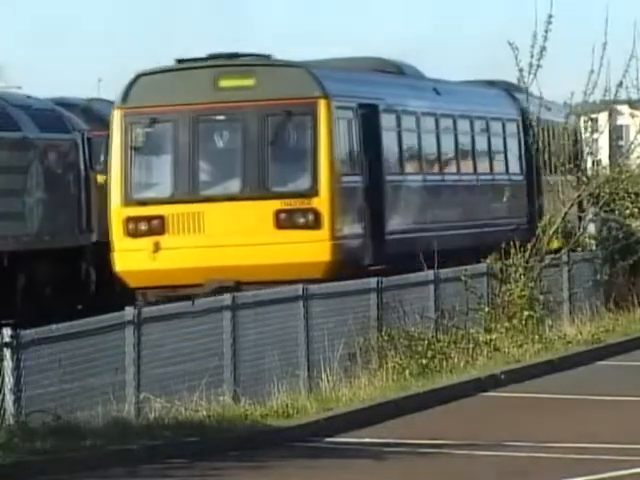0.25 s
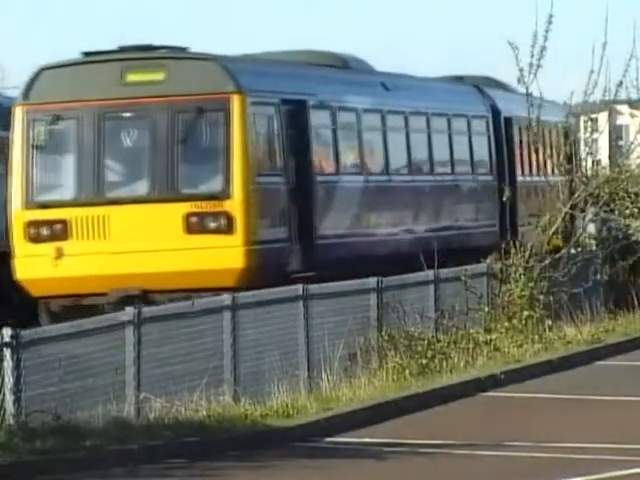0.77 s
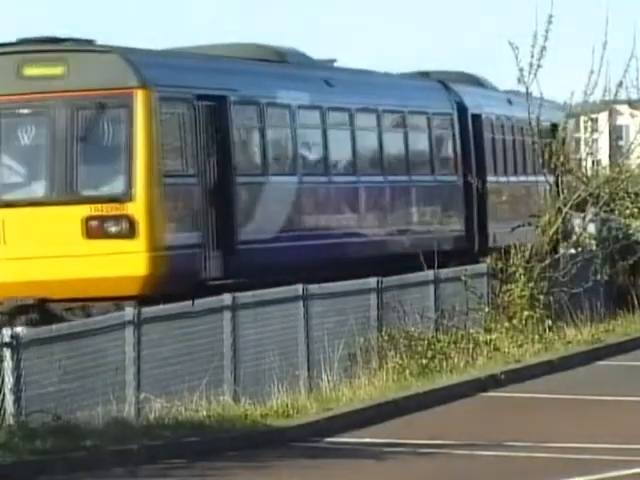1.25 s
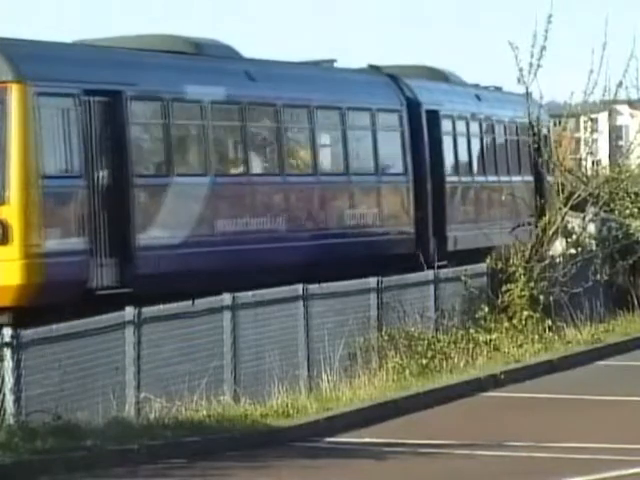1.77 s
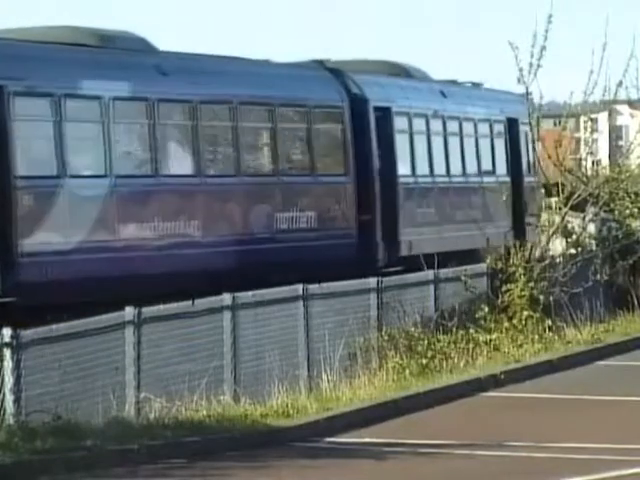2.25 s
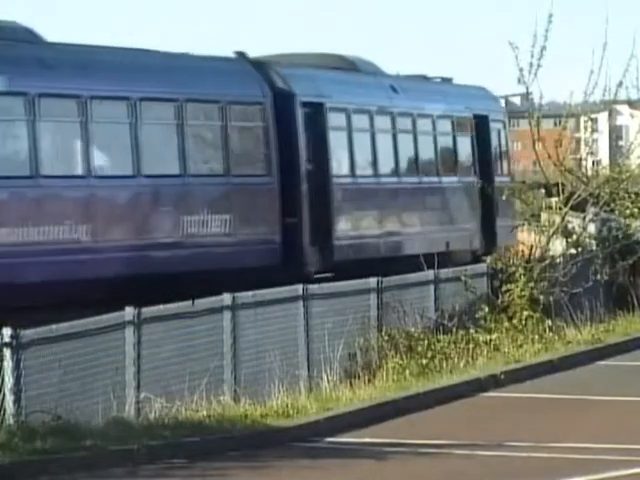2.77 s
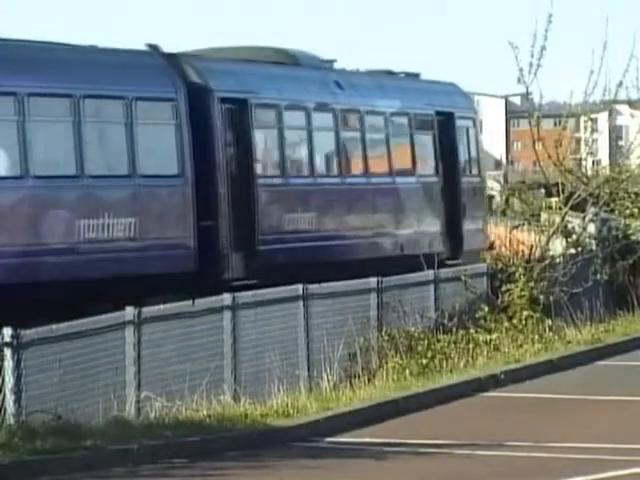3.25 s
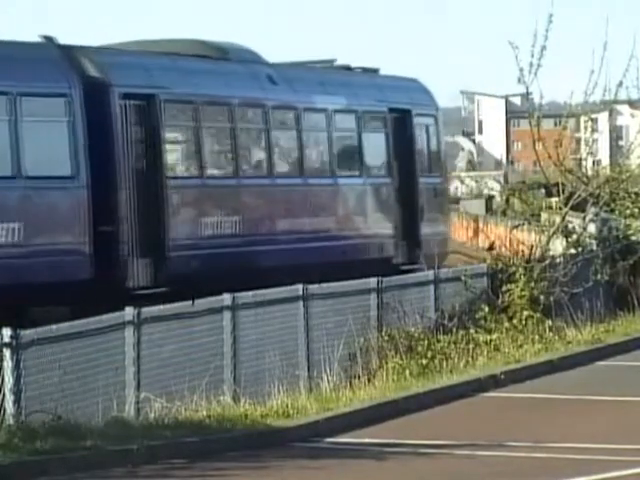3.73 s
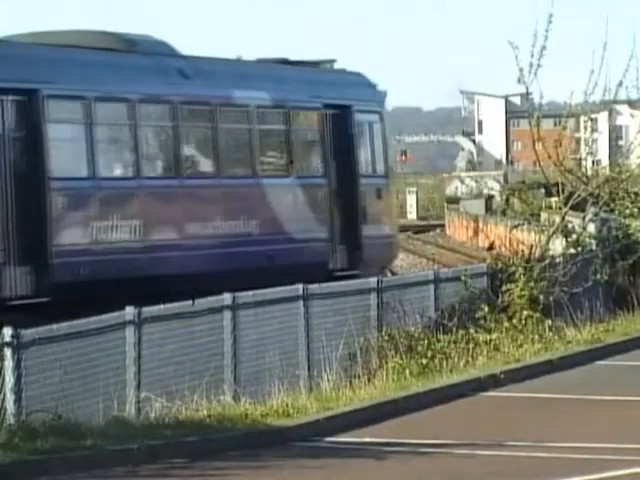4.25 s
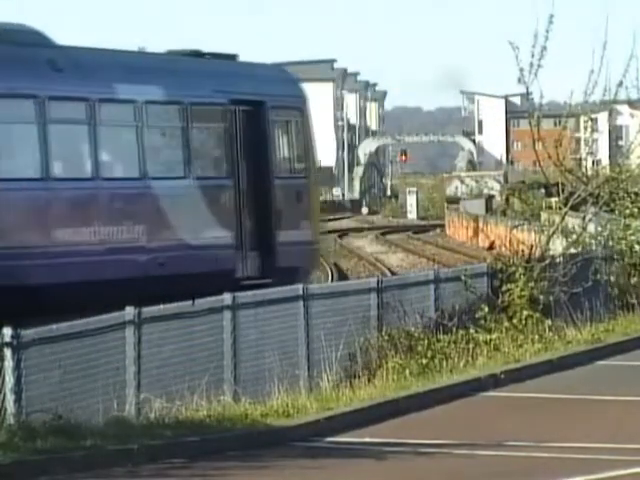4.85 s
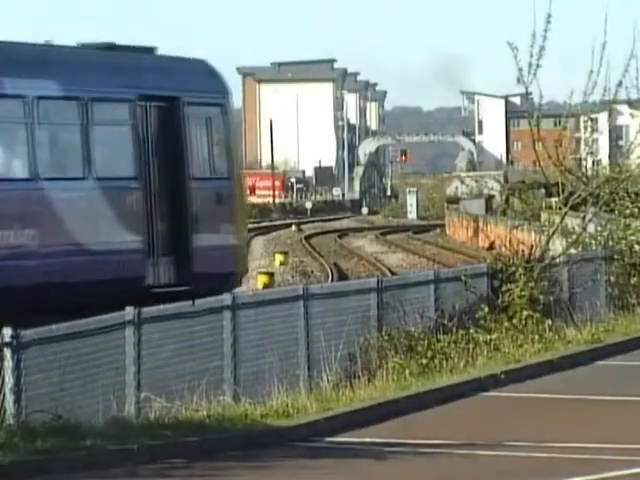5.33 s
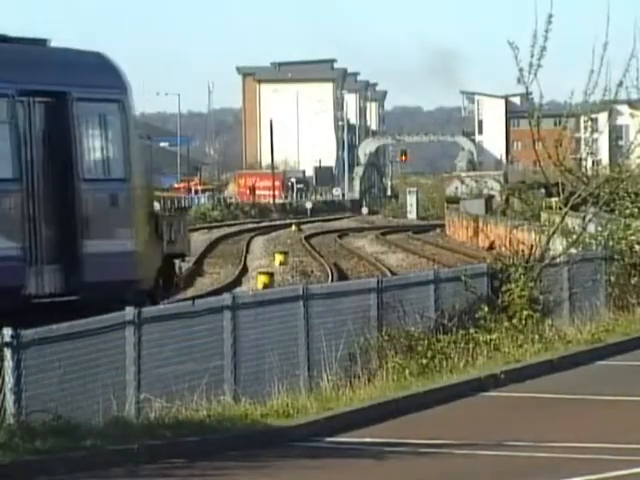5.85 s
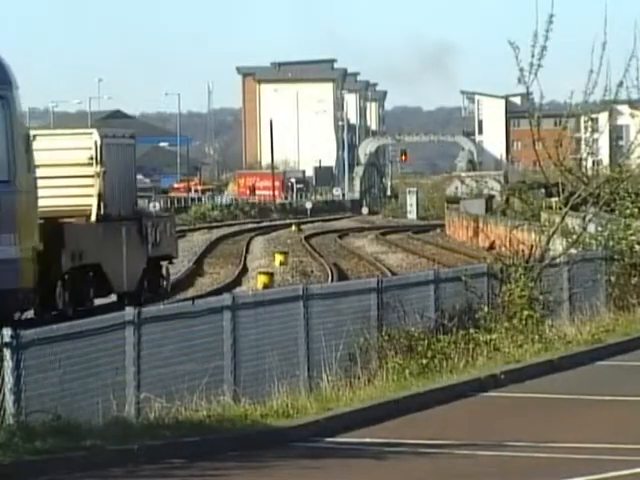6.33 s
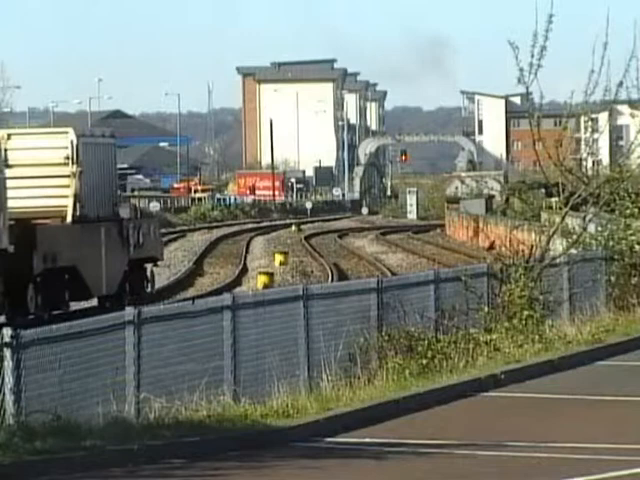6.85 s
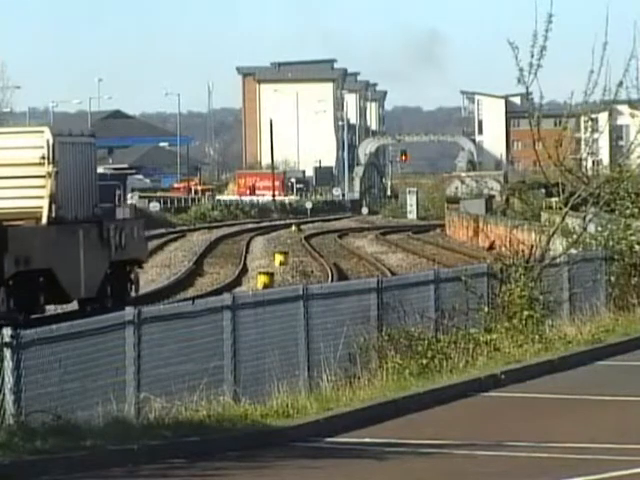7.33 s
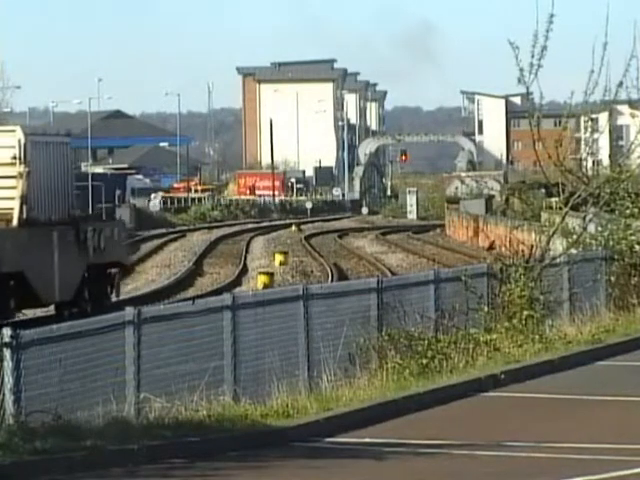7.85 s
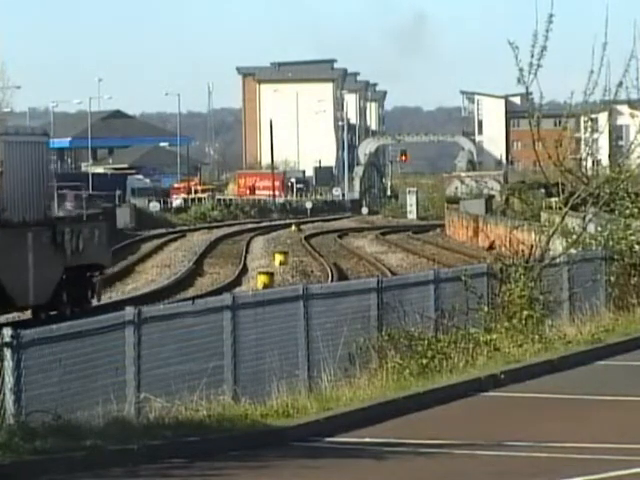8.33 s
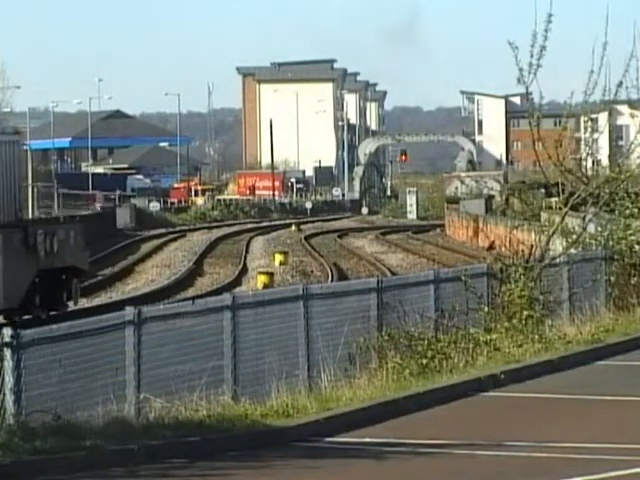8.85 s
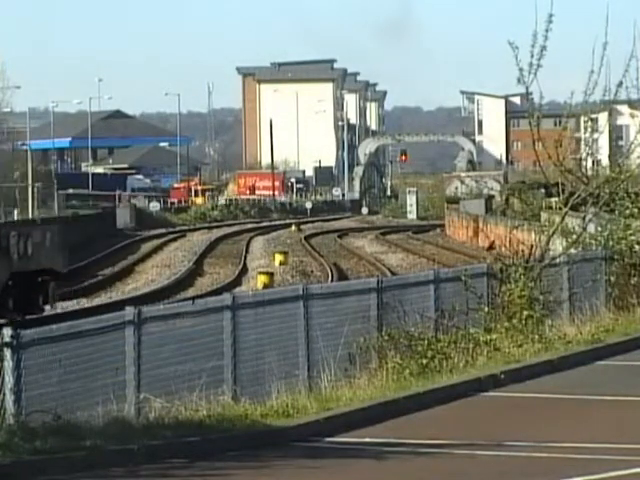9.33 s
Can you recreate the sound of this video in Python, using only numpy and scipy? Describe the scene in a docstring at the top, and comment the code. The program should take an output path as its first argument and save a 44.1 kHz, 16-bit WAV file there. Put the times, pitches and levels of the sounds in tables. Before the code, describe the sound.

Open-air trackside, stereo camcorder microphone, a slow train rounding a tight curve from right to left. At 0 s the squeal is already sounding: two almost pure tones near 3.2 kHz, about 20 Hz apart, beating rapidly, surging and dipping unevenly, with rasp and rough overtones. Soft, grainy rolling noise and weak rumble lie far below. A faint dull knock comes at 0.8 s; a low diesel drone near 90 Hz fades in by 1.3 s, clearest around 3.4 s. Thin whistles near 5 kHz flare between 2 and 4.5 s. Knocks resume at 5.6 and 6.1 s. After 6 s the higher wheel weakens, the lower one surges near 6.7 s, and bright flange hiss and squeaks increase. Clanks fall at 6.9 and 7.9 s, then cluster from 8.8 to 9.3 s, the last strongest. The squeal slips toward 3.13 kHz while hiss peaks at the 9.6 s cut.

```python
"""A diesel railcar and a slow freight train roll through a tight curve, passing from right to left.
From the start two slipping wheels squeal at nearly the same pitch and beat, with rasp and overtones around them.
Ringing modes, rumble and hiss made of shaped noise run below; short wobbling tones flare up as brief whistles.
A dull knock, a dying burst of noise, comes at 0.8 s; a low diesel drone of three tones fades in by 1.3 s.
More knocks follow from 5.6 s, the higher wheel weakens after 6 s, and the hiss is strongest at the end."""
import sys
import numpy as np
from scipy import signal
from scipy.fft import rfft, irfft, next_fast_len
from scipy.io import wavfile
from scipy.ndimage import uniform_filter1d, minimum_filter1d, map_coordinates

SR = 44100
rng = np.random.default_rng(int(sys.argv[2]) if len(sys.argv) > 2 else 0)


def store_wav(level_fs):
    """Save 16-bit WAV to argv[1]."""
    pcm = np.round(np.clip(np.atleast_2d(level_fs), -1, 1) * 32767)
    wavfile.write(sys.argv[1], SR, pcm.T.astype(np.int16))


N = 422919
T = np.arange(N) / SR  # time of each sample, in seconds

# All levels below are relative: each source may add its own gain.
# pitch of the lower squealing wheel, mostly sinking as it draws level and passes: [t/s, f/Hz]
LOW_PITCH = [(0, 3199.5), (1.3, 3197), (2.2, 3191), (2.85, 3192), (3, 3187), (3.45, 3184), (3.6, 3193),
             (3.8, 3184), (5, 3175), (5.6, 3172), (6.5, 3181), (6.75, 3172), (6.95, 3180), (7.6, 3166),
             (8.15, 3145), (8.55, 3140), (8.78, 3144), (9.15, 3125), (9.59, 3129)]
# pitch of a second wheel that sings a little higher, so the two beat: [t/s, f/Hz]
HIGH_PITCH = [(0, 3221), (.9, 3215), (2.4, 3212.5), (3.55, 3214), (3.7, 3208), (4.3, 3205), (5, 3198),
              (5.7, 3193), (5.87, 3201), (6.05, 3194), (6.3, 3212), (7.2, 3222), (8.4, 3180)]
# how hard the lower wheel squeals: [t/s, level/dB]
LOW_WHEEL = [(0.0, -24), (0.14, -14.5), (0.28, -23.5), (0.36, -31.5), (0.42, -23.5), (1.06, -18.5),
             (1.16, -25.0), (1.34, -20.5), (1.8, -26), (1.9, -18.5), (2.2, -19.5), (2.32, -32), (2.54, -23),
             (2.82, -26), (2.88, -22.5), (3.14, -27), (3.56, -22), (3.84, -28.5), (4.12, -26.5),
             (4.22, -38), (4.32, -22), (4.5, -21.5), (4.7, -37.5), (4.84, -22.5), (5.0, -25.5),
             (5.08, -31.5), (5.14, -22.5), (5.86, -37.5), (6.04, -30), (6.1, -37), (6.24, -18), (6.38, -27),
             (6.44, -21), (6.66, -14.5), (7.3, -27.0), (7.48, -24.5), (7.68, -37), (7.72, -22),
             (8.0, -39.5), (8.12, -22.5), (8.26, -21), (8.34, -29.5), (8.58, -17.5), (8.64, -27.5),
             (9.16, -19.5), (9.58, -27.5)]
# how hard the higher wheel squeals: [t/s, level/dB]
HIGH_WHEEL = [(0.0, -28.5), (0.64, -26.5), (0.7, -50), (0.9, -22), (1.22, -41), (1.28, -26.5), (1.68, -22),
              (2.16, -36), (2.3, -19), (2.5, -20), (2.86, -35.5), (3.74, -19.5), (4.62, -27.5), (4.9, -20),
              (5.22, -23.5), (5.54, -19), (5.8, -22.5), (5.88, -16.0), (6.08, -32.5), (6.5, -31),
              (6.72, -46), (7.16, -36.5), (7.28, -34), (9.58, -37)]
# centre of the stick-slip rasp from all the wheels: [t/s, f/Hz]
RASP_PITCH = [(0, 3195), (5, 3185), (7.2, 3180), (8.4, 3160), (9.59, 3140)]
# how roughly the wheels slip: [t/s, level/dB]
RASP = [(0, -34), (.32, -26.5), (.94, -30.5), (1.4, -27.5), (2.36, -29.5), (3.18, -33), (3.7, -28.5),
        (4.72, -27), (5.8, -30), (6.2, -26.5), (6.54, -25), (6.78, -30.5), (6.94, -33), (7.1, -28),
        (7.66, -28.5), (7.78, -22.5), (7.92, -30.5), (8.38, -27.5), (8.74, -31), (8.9, -26.5), (9.59, -32)]
# side modes that the slip rings roughly: [f/Hz, width/Hz]
SIDE_MODES = [(4030, 120), (5040, 128)]
# how hard the lower side mode rings: [t/s, level/dB]
LOWER_RING = [(0, -62), (0.9, -50.5), (1.9, -56), (2.45, -45.5), (2.9, -48), (3.4, -48), (3.75, -49.5),
              (4.15, -50.5), (4.4, -48.5), (4.65, -41), (5, -54.5), (7, -52.5), (9.59, -45)]
# how hard the upper side mode rings: [t/s, level/dB]
UPPER_RING = [(0, -44), (0.3, -39), (0.8, -41), (1.1, -40), (1.65, -46), (2.2, -45.5), (2.5, -41.5),
              (3, -38), (3.5, -36.5), (3.85, -42.5), (4.35, -41), (4.6, -45), (5, -47.5), (6, -49.5),
              (7, -48), (7.4, -46), (7.9, -59), (8.12, -51.5), (8.5, -51.5), (9.59, -52)]
# wheel modes kept ringing by plain rolling: [f/Hz, width/Hz, level against the rolling curve/dB]
ROLLING_MODES = [(802, 46, -12.5), (2302, 71, -11), (4300, 25, -11.5), (5406, 19, -5.5), (5800, 51, -15),
                 (6390, 50, -18.5), (7300, 40, -13), (7630, 66, -12)]
# wheels rolling on the rail: [t/s, level/dB]
ROLL = [(0.0, -44.5), (0.52, -43.5), (0.88, -48), (1.86, -45.0), (2.66, -49), (3.4, -44.5), (4.0, -48.5),
        (4.08, -46.5), (4.44, -48.5), (4.74, -45), (5.02, -49), (6.4, -43), (6.74, -48.5), (7.88, -40.5),
        (8.08, -49.0), (8.4, -42.5), (8.62, -45), (9.58, -40)]
# rail and wagon shaking: [t/s, level/dB]
SHAKE = [(0.0, -61.5), (1.36, -66.5), (1.39, -62), (2.67, -62), (3.44, -57.5), (4.3, -64.5), (6.65, -60.5),
         (6.73, -66.5), (7.66, -53.5), (8.07, -61.5), (9.46, -58), (9.59, -61)]
# rubbing wheel flanges: [t/s, level/dB]
FLANGE = [(0.0, -66), (0.05, -67), (0.37, -53.5), (0.88, -55), (1.36, -45), (2.06, -56), (2.88, -53.5),
          (3.28, -44.5), (4.75, -48.5), (5.02, -48.5), (6.22, -37.5), (6.81, -43), (7.32, -34.5),
          (7.91, -36), (8.14, -41.5), (8.36, -37.5), (8.86, -38), (9.59, -31.5)]
# spectrum of the shaking: [f/Hz, level/dB]
RUMBLE = [(20, -44), (32, -31), (45, 0.5), (70, -7), (120, 5.5), (190, 7), (280, 2), (420, -28), (900, -54)]
# spectrum of the rolling treads: [f/Hz, level/dB]
ROLLING = [(150, -61), (270, -6), (340, -0.5), (520, 1.5), (800, -2), (1100, -1), (1800, -2), (2700, -0.5),
           (3650, -24), (4700, -6.5), (5650, -11), (7000, -10.5), (10000, -12.5), (15000, -37)]
# spectrum of the flange hiss: [f/Hz, level/dB]
HISS = [(1500, -40), (3650, -11), (4300, -7), (5600, 2.5), (6400, 6), (8000, 6.5), (9600, 6), (12000, -2),
        (13000, -1.5), (14000, -7.5), (15500, -16)]
# spectrum of the extra top in the hiss: [f/Hz, level/dB]
SIZZLE = [(7000, -31), (9000, -26), (10700, 6), (12100, 5.5), (13200, -43), (15000, -34)]
# whistling tones flaring up, and faint rough noise bands near 14 kHz:
# [start t/s, end t/s, f/Hz, level/dB, roughness 0-1]
SQUEAKS = [(.02, .19, 2050, -43, .7), (.21, .3, 2050, -42, .7), (.32, .43, 2050, -42, .7),
           (.3, 1.2, 2050, -52, .7), (.2, 1.05, 5068, -42, .4), (.25, 1, 5032, -44, .5),
           (.25, .65, 9500, -55, .9), (.85, 2.6, 14080, -58.5, 1), (1.5, 2.3, 14000, -59, 1),
           (2.1, 2.85, 5119, -43, .25), (2.45, 3.0, 5078, -44, .3), (2.85, 3.65, 5055, -38.5, .6),
           (2.9, 3.7, 5014, -42, .6), (2.9, 3.55, 4921, -43.5, .85), (3.5, 3.95, 5079, -43.5, .45),
           (4.1, 4.5, 5077, -43, .3), (2.16, 2.31, 3240, -28, .2), (2.65, 3.75, 14030, -58, 1),
           (3.45, 4.4, 2020, -54, .9), (3.8, 4.8, 11620, -59, .6), (3.9, 4.9, 9470, -55, .8),
           (3.85, 4.15, 4069, -46, .5), (4.08, 4.48, 4069, -40.5, .7), (4.15, 4.45, 4035, -43, .7),
           (4.15, 4.52, 5119, -42, .35), (4.5, 4.85, 6130, -50, .4), (5.9, 6.7, 4280, -54, 1),
           (6.9, 7.12, 4270, -48, .85), (4.5, 6, 1235, -59, .9), (5.5, 6.5, 1080, -57, .7),
           (5.4, 6.8, 6420, -45, 1), (5.95, 6.9, 6335, -42.5, .55), (7.03, 7.11, 6380, -40, .7),
           (5.95, 6.7, 9499, -44, .3), (7.42, 7.85, 4250, -45, .9), (7.2, 7.58, 6485, -41, .5),
           (7.08, 7.32, 5952, -43, .3), (7.1, 7.55, 9780, -43, .5), (6.9, 7.7, 10835, -46, .6),
           (7.25, 7.68, 5368, -40.5, .6), (7.7, 7.95, 5015, -45, .7), (7.2, 8.1, 12112, -48, .4),
           (7.6, 8.15, 2170, -53, .9), (7.9, 9.7, 7130, -51, .8), (8.28, 8.95, 5022, -45, .5),
           (8.35, 8.7, 4245, -48, .9), (8.75, 9.8, 6080, -47.5, .55), (8.9, 9.7, 5010, -39.5, .55),
           (9.05, 9.7, 1160, -50, .6), (9.0, 9.8, 10697, -42.5, .5), (9.2, 9.8, 11060, -43, .8),
           (9.2, 9.8, 12055, -42, .6)]
# wheels knocking over rail joints: [t/s, level/dB]
KNOCKS = [(0.786, -40), (5.587, -40), (6.11, -34), (6.886, -29), (7.871, -32), (8.773, -35), (8.895, -27),
          (9.144, -28), (9.315, -22.5)]
# spectrum of the knocks: [f/Hz, level/dB]
CLANK = [(80, -36), (250, -2.0), (450, 4), (900, 9), (2400, -46), (6000, -30)]
# diesel engine: [t/s, firing rate f/Hz, level/dB]
DIESEL = [(0, 92, -86), (1.3, 87.3, -69.5), (2.6, 85.3, -70.5), (3.35, 91.3, -60), (3.8, 91.2, -66.5),
          (6.7, 92.8, -67), (8.1, 99.7, -95), (8.45, 93.6, -62), (9.59, 94.4, -70)]
# tones of the exhaust drone: [multiple of the firing rate, level/dB]
EXHAUST_ORDERS = [(.5, -24.5), (1, -1.0), (2, -5.5)]
# sound that differs between the two ports: [f/Hz, level/dB]
DIFFUSE = [(60, -16), (400, -15.5), (1300, -14), (3200, -14), (5000, -5.5), (9000, -12.5), (15000, -6)]
# direction of the train as it moves to the left: [t/s, lead of the left port/samples, left minus right/dB]
BEARING = [(0, 0.1, -0.2), (4.8, 0.4, 0.7), (6.2, 1, 1.5), (9.59, 0.92, 1.5)]
# tone colour of the left and right ports: [f/Hz, level/dB]
LEFT_COLOUR = [(60, -0.5), (400, -1.5), (1300, -0.67), (4400, 0.8), (8000, -5.7), (13000, 0.7)]
RIGHT_COLOUR = [(60, 0.5), (400, 1.2), (1300, 1.0), (4400, 2.5), (8000, -7.4), (13000, 2.5)]

WAVER_HZ, WAVER_DB = 1.223, 0.44  # spread of each squealing wheel's pitch and level
WAVER_RATE_HZ = 7.47  # how fast both waver
HUMP_HZ, HUMP_DB = 3118, -6.5  # rough hump low in the rasp: pitch, and level against the rasp
SLIP_WIDTH = 0.017  # width of a fully rough squeak, as a share of its pitch
HISS_SPREAD_DB = 4.8  # how unevenly the hissing modes swell
NOTCH_HZ, TOP_HZ = 150, 15500  # spacing of the camcorder's notches, and its upper limit


def undb(db):
    """Turn decibels into a gain factor."""
    return 10 ** (np.asarray(db) / 20)


def unit(x):
    """Scale a sound to rms 1, a standard average strength."""
    return x / np.sqrt(np.mean(np.abs(x) ** 2))


def curves(table):
    """Join the points of each column of a time table by straight lines."""
    s, *columns = np.transpose(table)
    return [np.interp(T, s, column) for column in columns]


def colour(x, points):
    """Make each frequency louder or softer, following a spectrum of (Hz, dB) points."""
    size = next_fast_len(N)
    hz, db = np.transpose(points)
    grid = np.arange(size // 2 + 1) * SR / size
    gain_db = np.interp(np.log(grid + 1), np.log(hz), db)
    return irfft(rfft(x, size) * undb(gain_db), size)[:N]


def noise(points):
    """Random hiss of rms 1 with the given spectrum."""
    return unit(colour(rng.standard_normal(N), points))


def flutter(width_hz, steep=2.46, step=16):
    """Random complex envelope of rms 1: how a mode of this width wobbles when friction drives it."""
    # drawn at every 16th sample, then joined by straight lines
    size = next_fast_len(N // step + 2)
    offset = np.fft.fftfreq(size, step / SR)
    chance = rng.standard_normal(size) + 1j * rng.standard_normal(size)
    spectrum = chance / (1 + (offset / width_hz) ** 2) ** (steep / 2)
    slow = unit(np.fft.ifft(spectrum))
    return np.interp(np.arange(N) / step, np.arange(size), slow)


def walk(rate_hz):
    """Random drift up and down with a spread of about 1."""
    return np.sqrt(2) * flutter(rate_hz).real


def tone(hz, envelope=1):
    """A tone on a fixed or moving pitch; a complex envelope shapes its level and phase."""
    phase = 2 * np.pi * (np.cumsum(hz + np.zeros(N)) / SR + rng.random())
    wave = np.real(envelope) * np.cos(phase) - np.imag(envelope) * np.sin(phase)
    return np.sqrt(2) * wave


def crowded_modes(x, spread_db, size=2048):
    """Many narrow modes share the sound; each swells and fades by itself over about half a second."""
    spectra = signal.stft(x, nperseg=size)[2]
    field = rng.standard_normal(spectra.shape)
    field = uniform_filter1d(field, size=3, axis=0)  # smooth over frequency
    field = uniform_filter1d(field, size=22, axis=1)  # smooth over time
    swelling = spectra * undb(spread_db * unit(field))
    return unit(signal.istft(swelling, nperseg=size)[1][:N])


def wheel(pitch, level):
    """One wheel locked on its mode: a pure tone that wavers a little in pitch and level."""
    (hz,), (db,) = curves(pitch), curves(level)
    moving_hz = hz + WAVER_HZ * walk(WAVER_RATE_HZ)
    moving_db = db + WAVER_DB * walk(WAVER_RATE_HZ)
    return tone(moving_hz, undb(moving_db))


def squeal(octave_db=-13, twelfth_db=-22):
    """Two wheels sing and beat; uneven stick-slip adds a rasp, a lower rough hump and rough overtones."""
    (hz,), (slip_db,) = curves(RASP_PITCH), curves(RASP)
    wheels = wheel(LOW_PITCH, LOW_WHEEL) + wheel(HIGH_PITCH, HIGH_WHEEL)
    rasp = tone(hz, flutter(width_hz=80, steep=2.71))
    hump = undb(HUMP_DB) * tone(HUMP_HZ, flutter(width_hz=20))
    octave = undb(octave_db) * tone(2 * hz, flutter(width_hz=197, steep=1.93))
    twelfth = undb(twelfth_db) * tone(3 * hz, flutter(width_hz=390, steep=3.2))
    return wheels + undb(slip_db) * (rasp + hump + octave + twelfth)


def side_modes(swell_db=2.2):
    """Two further wheel modes catch the slip and ring roughly above the squeal's pitch, in uneven swells."""
    levels = curves(LOWER_RING) + curves(UPPER_RING)  # a list of two curves
    out = np.zeros(N)
    for (hz, width), db in zip(SIDE_MODES, levels):
        out += undb(db + swell_db * walk(12)) * tone(hz, flutter(width_hz=width))
    return out


def rolling_modes(waver_db=2):
    """Rough treads keep the wheel discs ringing faintly; each mode comes and goes."""
    roll_db, = curves(ROLL)
    out = np.zeros(N)
    for hz, width, db in ROLLING_MODES:
        level = undb(roll_db + db + waver_db * walk(1.9))
        out += level * tone(hz, flutter(width_hz=width))
    return out


def rolling(rumble_db=2, tread_db=4, flange_db=3, sizzle_db=-43, hard_rub_db=-39, growth=1.6):
    """Rough treads shake rail and wagon; rubbing flanges hiss through the wheels' crowded high modes."""
    (roll_db,), (hiss_db,), (shake_db,) = curves(ROLL), curves(FLANGE), curves(SHAKE)
    rumble = undb(shake_db + rumble_db + 0.68 * walk(5.8)) * noise(RUMBLE)
    tread_level = undb(roll_db + tread_db + 0.48 * walk(12.0))
    tread = tread_level * crowded_modes(noise(ROLLING), spread_db=2.0)
    hiss_level = undb(hiss_db + flange_db + .5 * walk(22))
    hiss = hiss_level * crowded_modes(noise(HISS), HISS_SPREAD_DB)
    # harder rubbing brightens the hiss: its top grows faster than the rest, until the flange rubs hard
    rub_db = hiss_db - hard_rub_db
    sizzle_level = undb(sizzle_db + np.minimum(growth * rub_db, rub_db))
    sizzle = sizzle_level * crowded_modes(noise(SIZZLE), HISS_SPREAD_DB)
    return rumble + tread + hiss + sizzle


def squeaks(gain_db=4.0):
    """Whistling tones and faint rough bands swell and let go; roughness widens each tone towards noise."""
    out = np.zeros(N)
    for start, end, hz, db, rough in SQUEAKS:
        progress = np.clip((T - start) / (end - start), 0, 1)
        swell = np.sqrt(np.maximum(np.sin(np.pi * progress), 0))
        wobble = flutter(SLIP_WIDTH * rough * hz)
        envelope = np.sqrt(1 - rough ** 2) + rough * wobble  # steady part plus rough part
        out += undb(db + gain_db) * swell * tone(hz, envelope)
    return out


def knocks(t60=0.11, gain_db=-9):
    """Each rail joint gives a dull clank that dies in the bogie, falling 60 dB in t60 seconds."""
    blows = np.zeros(N)
    for s, db in KNOCKS:
        decay = np.exp(-np.log(1000) * np.maximum(T - s, 0) / t60)
        blows += undb(db + gain_db) * (T >= s) * decay
    return blows * noise(CLANK)


def diesel():
    """Exhaust drone at the firing rate, with a weaker half order and octave, all slightly unsteady."""
    hz, db = curves(DIESEL)
    out = np.zeros(N)
    for multiple, part_db in EXHAUST_ORDERS:
        unsteady = 1 + 0.26 * flutter(width_hz=7.8)
        out += undb(db + part_db) * tone(multiple * hz, unsteady)
    return out


def scattered(x, t60=0.22, shift_hz=3.6):
    """Dense echoes off fence, ballast and wagon sides, at half the power; paths shift as the train moves."""
    t = T[:SR // 3]
    out = np.zeros(N)
    for _ in range(3):
        response = rng.standard_normal(len(t)) * np.exp(-np.log(1000) * t / t60)
        out += walk(shift_hz) * signal.fftconvolve(x, response)[:N]
    return unit(out) * np.std(x) / np.sqrt(2)


def at_ports(x, lead, pan_db):
    """A source as two ports hear it: the left one earlier by lead samples and louder by pan_db."""
    ports = []
    for sign in (1, -1):
        shifted = map_coordinates(x, [np.arange(N) + sign * lead / 2], order=3)
        ports.append(undb(sign * pan_db / 2) * shifted)
    return np.array(ports)


def scene(squeal_lead=0.59, squeal_pan_db=0.05):
    """The train reaches the left port slightly first; reflections and wheels further along it widen the sound."""
    screech = squeal()
    whistles = side_modes() + squeaks() + rolling_modes()
    train = whistles + rolling() + knocks() + diesel()
    further_wheels = rolling()
    side = colour(scattered(screech + whistles) + further_wheels, DIFFUSE)
    lead, pan_db = curves(BEARING)
    direct = at_ports(train, lead, pan_db)
    direct += at_ports(screech, lead + squeal_lead, pan_db + squeal_pan_db)
    left, right = direct
    # the side sound has opposite signs at the two ports, which makes it wide
    return np.array([colour(left + side, LEFT_COLOUR), colour(right - side, RIGHT_COLOUR)])


def notch_comb(x, feedback=0.45, depth=0.73):
    """Weaken every multiple of one frequency, as camcorders do against their own motor whine."""
    period = SR // NOTCH_HZ
    # one period per row: comparing each row with the last weakens whatever repeats
    rows = np.pad(x, ((0, 0), (0, -N % period))).reshape(2, -1, period)
    notched = signal.lfilter([1, -1], [1, -feedback], rows, axis=1)
    notched = notched.reshape(2, -1)[:, :N] * (1 + feedback) / 2
    return depth * notched + (1 - depth) * x


def limiter(x, ceiling_db=-9, hold_s=0.0043):
    """The gain of both ports dips smoothly under the loudest swells."""
    size = int(hold_s * SR) + 1
    peak = np.abs(x).max(axis=0) + 1e-9
    gain = np.minimum(1, undb(ceiling_db) / peak)
    return x * uniform_filter1d(minimum_filter1d(gain, size), size)


def record(dry):
    """The camcorder weakens its motor frequencies, limits the peaks and cuts the top."""
    limited = limiter(notch_comb(dry))
    top_cut = signal.ellip(8, .2, 70, TOP_HZ, fs=SR, output="sos")  # 0.2 dB ripple, 70 dB cut
    return signal.sosfilt(top_cut, limited)


dry = scene()
out = record(dry)
store_wav(out)
```